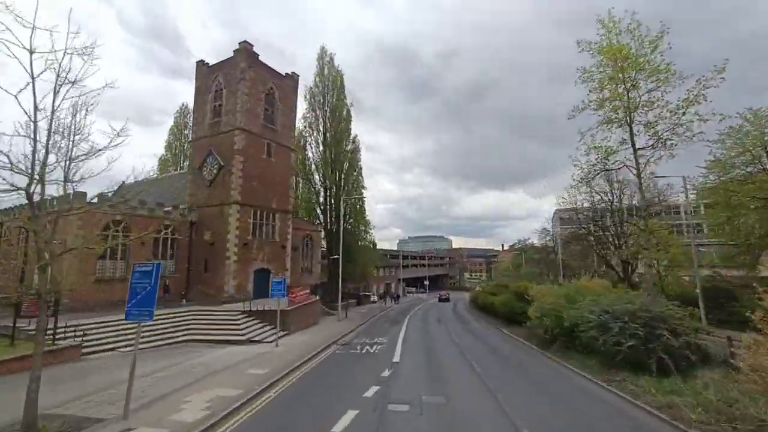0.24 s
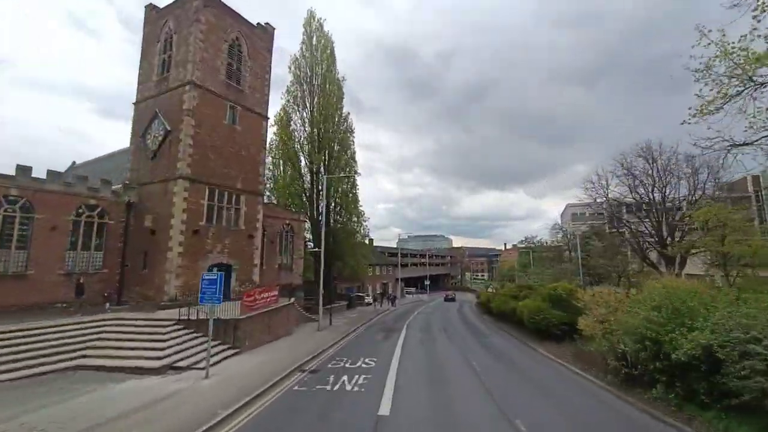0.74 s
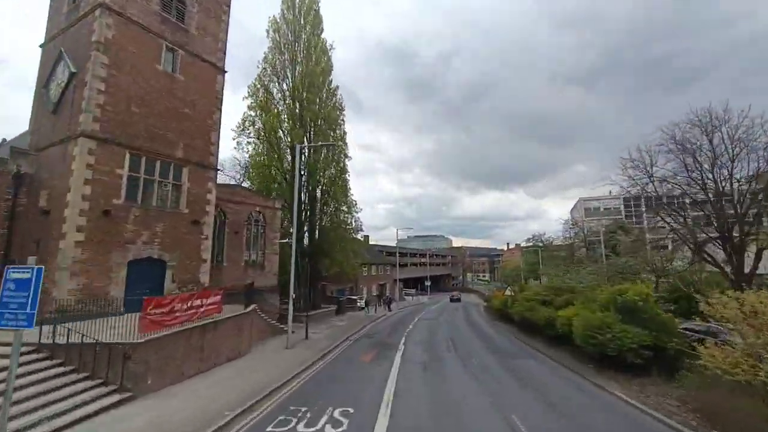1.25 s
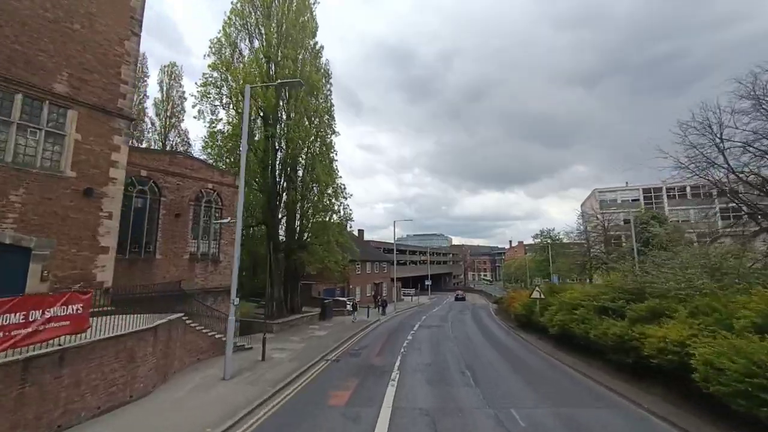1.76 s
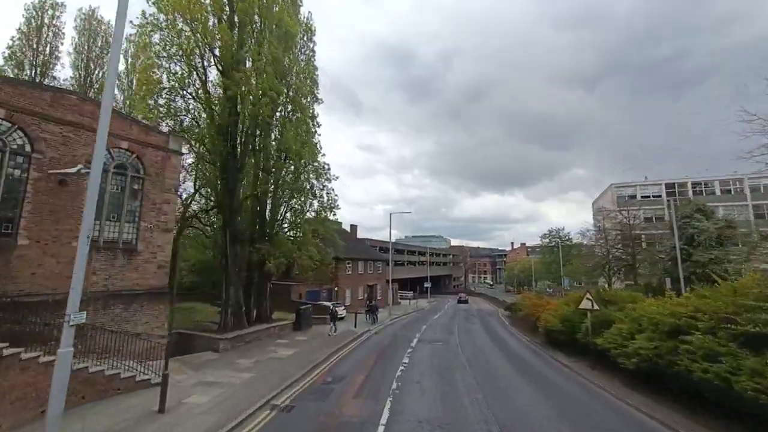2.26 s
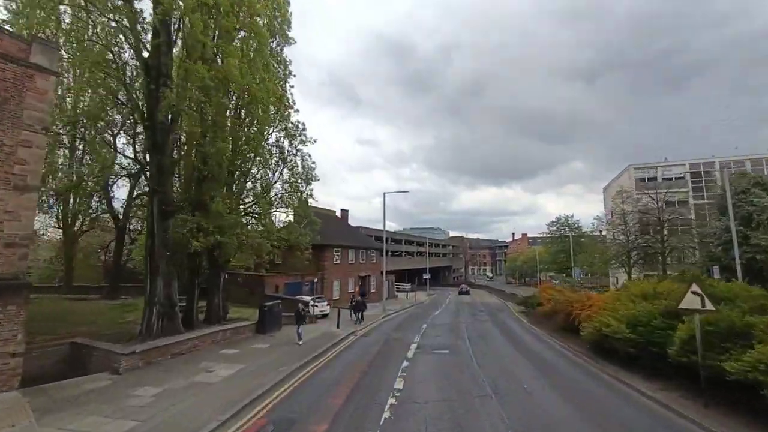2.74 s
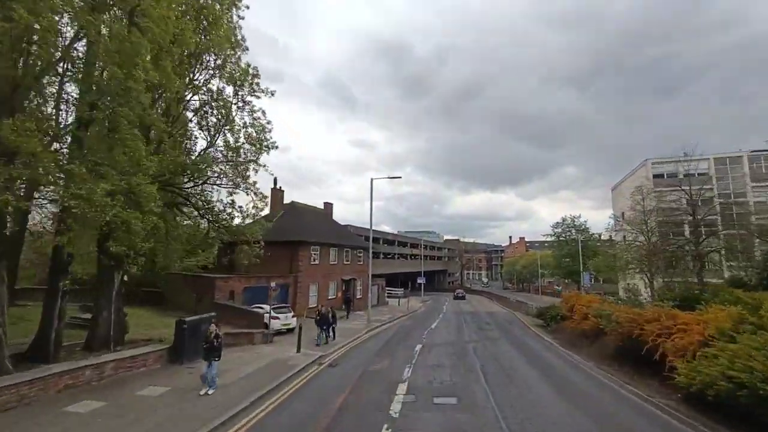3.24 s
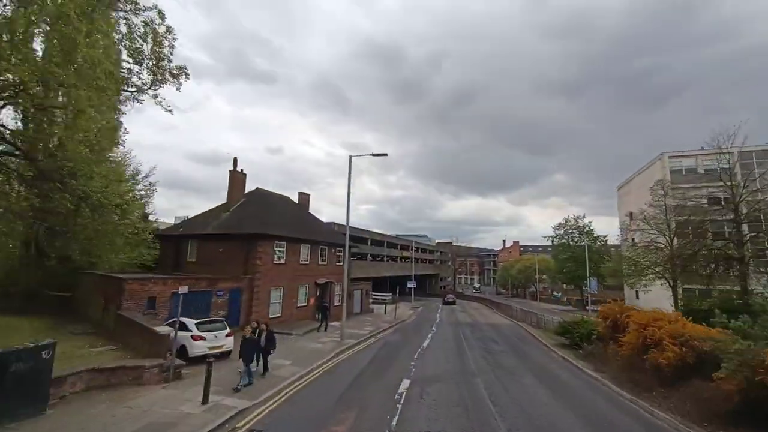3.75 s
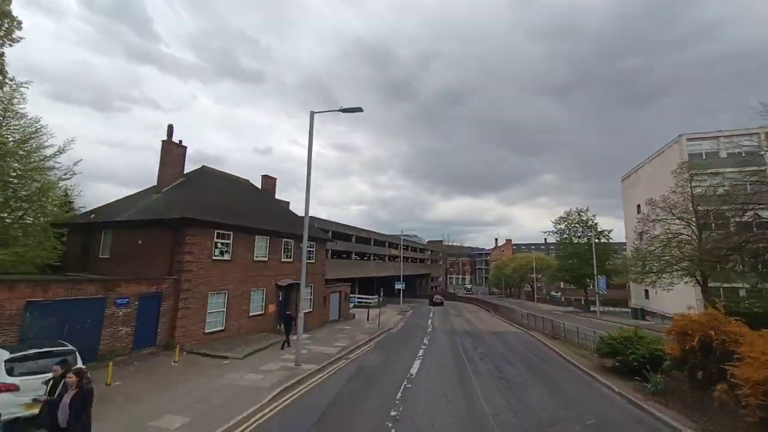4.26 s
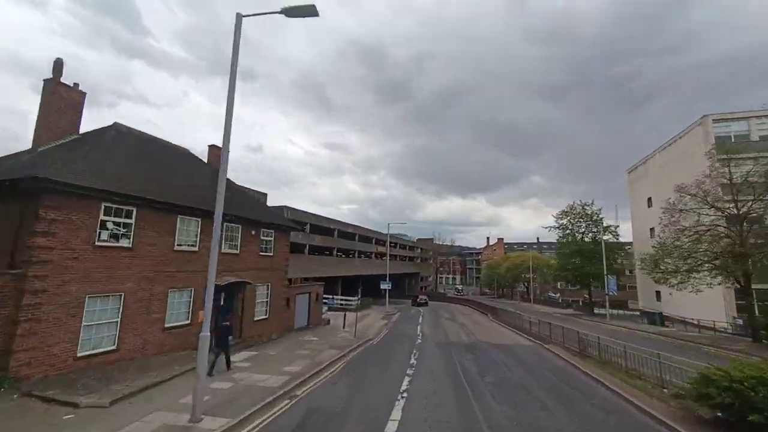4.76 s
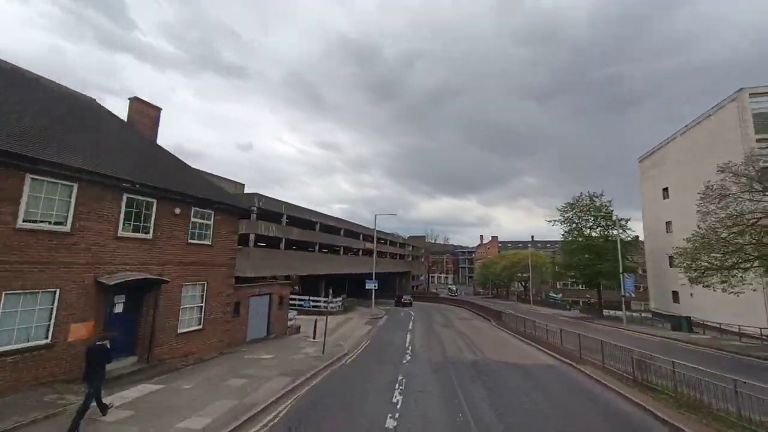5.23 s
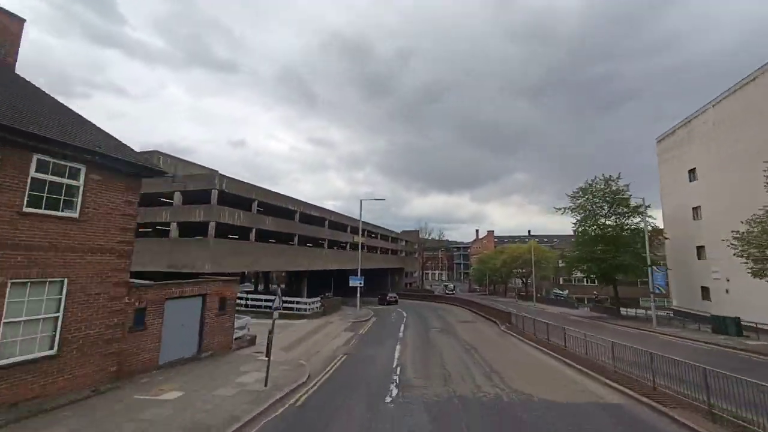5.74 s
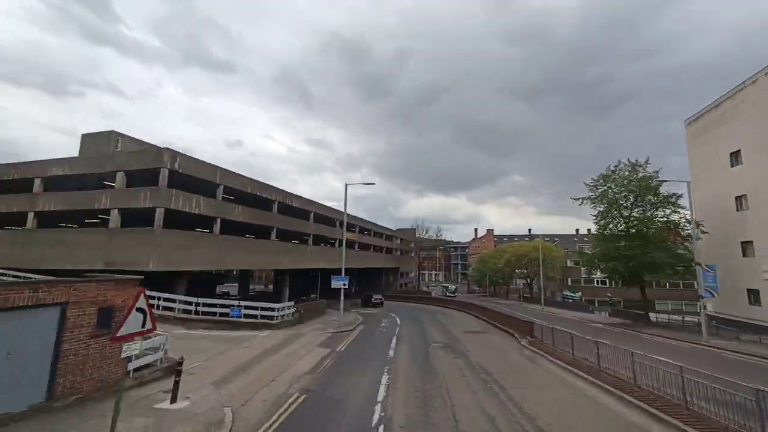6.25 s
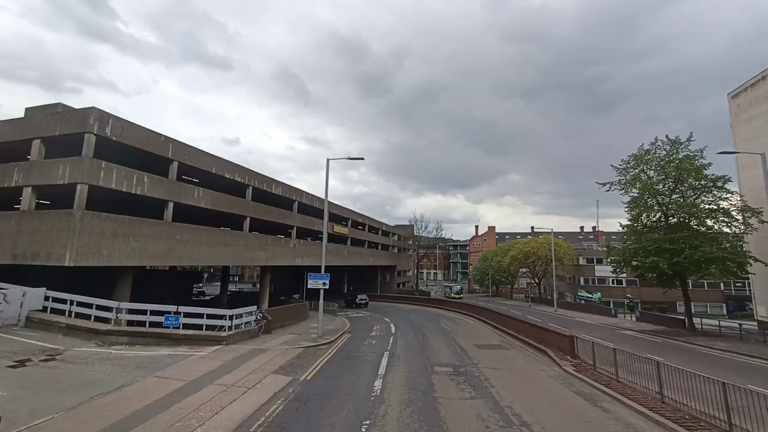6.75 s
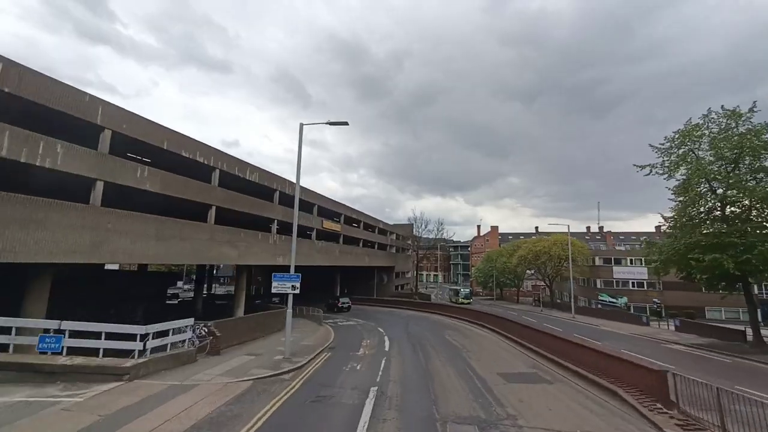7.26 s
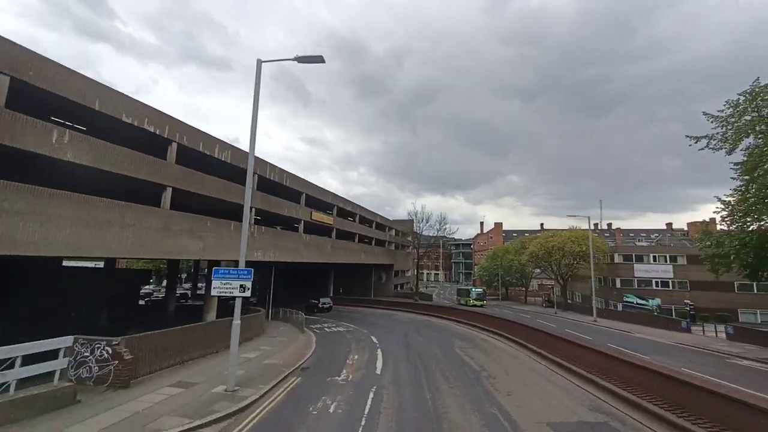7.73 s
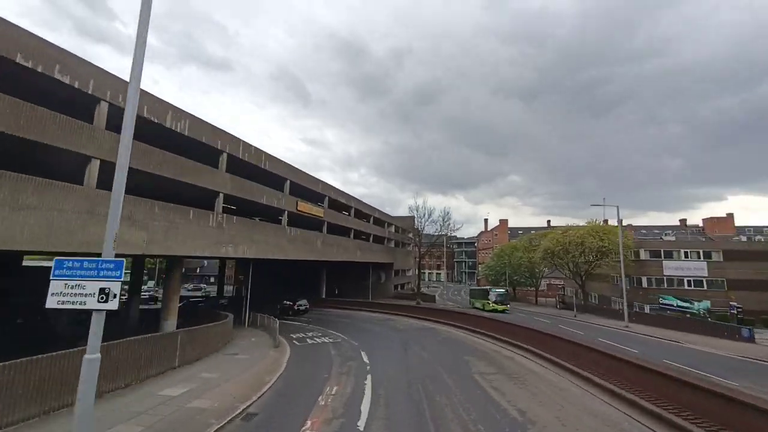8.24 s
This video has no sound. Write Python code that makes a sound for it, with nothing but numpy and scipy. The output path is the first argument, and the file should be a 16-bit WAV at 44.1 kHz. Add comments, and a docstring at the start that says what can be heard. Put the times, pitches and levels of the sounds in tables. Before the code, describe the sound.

A seat microphone upstairs on a bus catches constant low rumble, booming panels and airy trim chatter. Early gear whine fades, then jolts bring thuds, rattles, sharp ticks and tiny squeaks, clustering around five seconds. The engine swells before a downshift near seven seconds, followed by a higher hum and several falling gear whines as the bus slows.

```python
"""A diesel drones far below the upper deck of a double-decker bus, with axle whine and road rumble from the start.
The bus slows gently down a city street and shifts down once near 7 s; engine, gears and shaft are geared to its speed.
The road is filtered noise that heaves the body, booms in the panels and roars under the floor, jolted by bumps.
Trim and windows chatter as showers of tiny noise bursts, fittings tick as snap and ring, panel edges squeak as
unsteady sines, and a vent whistles faintly. The surface is coarsest near 5.6 s and 7.4 s."""
import sys
import numpy as np
from scipy import signal
from scipy.fft import rfft, irfft
from scipy.io import wavfile
from scipy.ndimage import uniform_filter1d

SR = 44100
rng = np.random.default_rng(int(sys.argv[2]) if len(sys.argv) > 2 else 0)


def bounce(signal):
    """Save signal as a 16-bit WAV file at the path given by the first command-line argument."""
    frames = np.transpose(np.atleast_2d(signal))
    limited = np.clip(frames, -1, 1)
    pcm = np.round(limited * 32767).astype(np.int16)
    wavfile.write(sys.argv[1], SR, pcm)


N = 374850
TIME = np.arange(N) / SR


def gain_of(db):
    """Turns decibels into an amplitude factor."""
    return 10 ** (np.asarray(db) / 20)


def evened(x):
    """Scales to rms 1."""
    return x / np.sqrt(np.mean(x ** 2) + 1e-20)


def follow(rows):
    """Joins the points of a curve table by straight lines: one curve per column after the time."""
    s, *columns = np.transpose(rows)
    return [np.interp(TIME, s, column) for column in columns]


def colour(x, points, tilt_db=0):
    """Filters by a spectrum drawn over octaves, tilted by some dB per octave."""
    octave = np.log2(np.fft.rfftfreq(len(x), 1 / SR) + 1)
    hz, db = np.transpose(points)
    shape_db = np.interp(octave, np.log2(hz + 1), db, left=-100, right=-100)
    tilt = tilt_db * (octave - octave.mean())
    return irfft(rfft(x) * gain_of(shape_db + tilt), len(x))


def wander(rate_hz):
    """Random drift of rms 1, smoothed to fade out above a rate."""
    s = np.arange(0, N / SR + 1, 1 / 2048)
    hz = np.fft.rfftfreq(len(s), s[1])
    smoothing = np.exp(-(hz / rate_hz) ** 2) * (hz > 0)
    slow = irfft(rfft(rng.standard_normal(len(s))) * smoothing, len(s))
    return evened(np.interp(TIME, s, slow))


def steadied(x, span_s, firmness=0.81):
    """Evens out the running rms, leaving the faster beating."""
    size = max(int(span_s * SR), 2)
    power = uniform_filter1d(uniform_filter1d(evened(x) ** 2, size), size)
    return evened(x / (abs(power) + 1e-9) ** (firmness / 2))


def add(mix, s, sound):
    """Lays a sound into the mix at a time."""
    part = mix[max(round(s * SR), 0):][:len(sound)]
    part += sound[:len(part)]


def cabin(x, t60, wet_db):
    """The direct sound and a short diffuse tail from the windows and ceiling."""
    t = TIME[:SR // 2]
    tail = rng.standard_normal(len(t)) * gain_of(-60 * t / t60)
    return x + gain_of(wet_db) * signal.fftconvolve(x, tail / np.linalg.norm(tail))[:N]


def swell(start, hold, attack_s, fall_db_per_s):
    """The gain of one event: a straight attack, a hold, then a steady fall in dB."""
    age = TIME - start
    fall_db = -fall_db_per_s * np.maximum(age - attack_s - hold, 0)
    return np.clip(age / attack_s, 0, 1) * gain_of(fall_db)


# road speed, which drives the whole driveline: time_s, axle_tooth_rate_hz
ROAD_SPEED = [(0, 660), (.6, 649), (1.4, 630), (2.4, 614), (3.7, 605), (5.6, 597), (6.3, 581), (7.0, 561),
              (7.45, 541), (7.9, 532), (8.15, 521), (8.5, 513)]


def axle_rate():
    """Axle teeth meshing per second (Hz), falling as the bus slows."""
    return follow(ROAD_SPEED)[0]


HIGH_GEAR, LOW_GEAR = 13.72, 9.65  # axle teeth passing per firing
SHIFT_S, SHIFT_LENGTH_S = 7.05, .45  # middle and length of the downshift


def firing(waver=0.004):
    """Gears the engine to the road: firing rate (Hz), firings counted with a waver, downshift progress (0-1)."""
    shifted = np.clip((TIME - SHIFT_S) / SHIFT_LENGTH_S + .5, 0, 1)
    hz = axle_rate() / (HIGH_GEAR + (LOW_GEAR - HIGH_GEAR) * shifted)
    turns = np.cumsum(hz * (1 + waver * wander(7.9))) / SR
    return hz, turns, shifted


# engine effort: time_s, level_db
ENGINE_EFFORT = [(0, -30), (1.6, -30), (2.5, -32), (4.2, -27.5), (5.7, -32), (6.55, -23), (7.05, -27.5),
                 (7.8, -26.5), (8.5, -26)]
# harmonics of the firing rate: multiple, high_gear_db, low_gear_db (relative to one another)
FIRING_HARMONICS = [(1, 4, -0.5), (2, -13.5, -9), (3, -17.5, -18.5), (4, -21, -27), (5, -22, -25.5),
                    (7, -30, -23), (11, -28, -34)]
# resonances of the deck that the engine excites: centre_hz, half_width_hz, lift_db
DECK_DRONES = [(87, 2.9, 5), (142, 6.4, 5.5)]


def engine(hz, turns, shifted, flutter_db=1.3):
    """Firing harmonics rebalance at the downshift, and the deck drones when one meets a resonance."""
    effort_db, = follow(ENGINE_EFFORT)
    out = np.zeros(N)
    for multiple, high_db, low_db in FIRING_HARMONICS:
        drone_db = sum(lift_db / (1 + ((multiple * hz - centre) / half_width) ** 2)
                       for centre, half_width, lift_db in DECK_DRONES)
        gear_db = high_db + (low_db - high_db) * shifted
        order_db = gear_db + drone_db + flutter_db * wander(6.6)
        out += gain_of(order_db) * np.cos(2 * np.pi * multiple * turns)
    return gain_of(effort_db) * evened(out)


WHINE_FLUTTER_DB, WHINE_WAVER = 1.7, .0025  # rms of the level drift, rms of the pitch drift as a fraction
WHINE_ROUGH, WHINE_FUZZ_HZ = .28, 32  # amount and width of the noise around the line


def whine(hz):
    """Meshing gear teeth: a trembling line, roughened by the play between the teeth."""
    angle = 2 * np.pi * np.cumsum(hz * (1 + WHINE_WAVER * wander(7.3))) / SR
    fuzz = wander(WHINE_FUZZ_HZ) * np.cos(angle) + wander(WHINE_FUZZ_HZ) * np.sin(angle)
    tone = np.sin(angle) + WHINE_ROUGH * fuzz
    return evened(tone * gain_of(WHINE_FLUTTER_DB * wander(10.0)))


# pairs of gears whine while they bear the load: start_s, hold_s, pitch_ratio (of the axle's rate), level_db
GEAR_WHINES = [(-.2, 1.2, 1, -58), (-.2, 1.1, .789, -51), (-.2, .85, .562, -51), (2.05, 1.2, 1, -56),
               (3.08, .4, .787, -52), (6.0, .6, 1, -53), (6.65, .25, 1, -50), (6.7, .8, .695, -52),
               (7.29, .6, 1.339, -54.5), (7.38, .65, 1, -48.5), (7.55, .9, 1.087, -51.5),
               (8.1, .35, 1, -45), (8.05, .45, .708, -49.5)]


def gears():
    """Axle and gearbox whines come and go with the load, their pitch falling with the road speed."""
    axle_hz = axle_rate()
    out = np.zeros(N)
    for s, hold, ratio, db in GEAR_WHINES:
        gain = gain_of(db) * swell(s, hold, attack_s=.07, fall_db_per_s=90)
        out += gain * whine(ratio * axle_hz)
    return out


SHAFT_TEETH = 7  # teeth on the drive pinion


def shaft(boom_gain, flutter_db=1.0, coupling_db=-10.5):
    """The drive shaft hums once per turn of its pinion, its level following the panel boom."""
    hum = np.sin(2 * np.pi * np.cumsum(axle_rate() / SHAFT_TEETH) / SR)
    return boom_gain * gain_of(coupling_db) * evened(hum * gain_of(flutter_db * wander(3.8)))


# coarseness of the road surface: time_s, coarseness_db
ROAD_SURFACE = [(0, -4), (1.2, -2), (2.7, 0), (4.2, -1.5), (5.6, 3), (6.4, -1.5), (7.4, 2.5), (8.1, -2),
                (8.5, 0.5)]


def coarseness():
    """Surface coarseness (dB), shared by the road noise and the chatter."""
    return follow(ROAD_SURFACE)[0]


# the wheels cross a bump or a broken patch: start_s, hold_s, heave_db, boom_db, roar_db
BUMPS = [(1.345, 0.064, -15, -23.5, -35.5), (1.46, 0.076, -25, -28.5, -36),
         (1.823, 0.13, -16.5, -28.5, -40.5), (2.034, 0.17, -20, -35, -45.5), (3.367, 0.23, -31, -32, -46),
         (3.737, 0.047, -37.5, -29, -64), (3.932, 0.11, -22.5, -34.5, -48.5),
         (4.399, 0.026, -29, -23.5, -41.5), (4.47, 0.032, -32.5, -29, -40.5),
         (4.717, 0.38, -28, -32.5, -47), (4.967, 0.24, -16, -33, -47), (5.106, 0.045, -18.5, -28.5, -36.5),
         (5.834, 0.12, -21.5, -44, -54.5), (6.932, 0.15, -28, -36.5, -44.5), (7.413, 0.062, -21, -45, -52),
         (8.35, .17, -21, -31, -45)]
BUMP_ATTACK_S = 0.042


def shaking(column, steady_db, surface_share, fall_db_per_s):
    """Gain of heave (0), boom (1) or roar (2): the steady surface plus the bumps, added as powers."""
    steady = gain_of(steady_db + surface_share * coarseness()) ** 2
    bumps = sum((gain_of(dbs[column]) * swell(s, hold, BUMP_ATTACK_S, fall_db_per_s)) ** 2
                for s, hold, *dbs in BUMPS)
    return np.sqrt(steady + bumps)


# Spectra, all: pitch_hz, level_db (relative within each)
# slow heave of the body, with resonances of the wheels and frame
HEAVE_SPECTRUM = [(5, -30), (9, -9.5), (13, 7), (18, -3.5), (24.5, 1.5), (29, -5.5), (34, -3), (39, -12.5),
                  (47, -16.5), (54, -9), (63, -32), (90, -52.5)]
# boom of the panels: pitch_hz, level_db
BOOM_SPECTRUM = [(50, -29), (63, -5.5), (71, 6.5), (76, -0.5), (84, 1.5), (97, -1), (104, -5), (112, -0.5),
                 (121, -4), (131, -6), (150, -10), (166, -6), (183, -10), (202, -5.5), (222, -12.5),
                 (243, -10), (280, -20), (420, -39)]
# tyres heard through the floor: pitch_hz, level_db
ROAR_SPECTRUM = [(200, -15.5), (280, -3), (330, 0.5), (380, 3.5), (480, 0.5), (570, -4.5), (660, -8),
                 (715, -6.5), (780, -14), (850, -12.5), (930, -11), (1060, -19.5), (1400, -22),
                 (2500, -40.5)]
# thud of the floor under a hard jolt: pitch_hz, level_db
THUD_SPECTRUM = [(90, -14.5), (135, 2), (310, 3.5), (620, -17), (1500, -21), (2400, -28.5)]


def road(boom_gain, thud_db=-2):
    """The road heaves the body, drums its panels and roars under the tyres; jolts thud through the floor."""
    def rumble(spectrum, span_s):
        return steadied(colour(rng.standard_normal(N), spectrum), span_s)

    heave_gain = shaking(column=0, steady_db=-25.5, surface_share=0.31, fall_db_per_s=29.0)
    roar_gain = shaking(column=2, steady_db=-42.0, surface_share=0.3, fall_db_per_s=59.5)
    heave = heave_gain * rumble(HEAVE_SPECTRUM, 0.25)
    boom = boom_gain * rumble(BOOM_SPECTRUM, .14)
    roar = roar_gain * rumble(ROAR_SPECTRUM, 0.34)
    # only what rises above the usual roar counts as a jolt
    jolt = np.maximum(roar_gain - np.median(roar_gain), 0)
    thud = jolt * gain_of(thud_db) * rumble(THUD_SPECTRUM, .04)
    return heave + boom + roar + thud


# the trim shakes loose: start_s, hold_s, level_db (before the top boost), top_boost_db
RATTLES = [(1.31, 0.88, -49, 3.5), (1.414, 0.061, -43, -15), (1.489, 0.065, -42, -1.5),
           (1.815, 0.23, -50, -9), (2.008, 0.048, -49, 11.5), (2.192, 0.022, -47.5, 7.5),
           (2.707, 0.052, -51, 8.5), (3.249, 0.086, -55.5, 5), (3.394, 0.084, -48.5, 3.5),
           (3.548, .08, -49, 4), (4.434, 0.12, -55, 4), (4.953, 0.075, -43, 4), (5.056, 0.42, -50.5, -1),
           (5.156, 0.04, -43, 7), (5.326, 0.025, -49.5, 1), (5.88, 0.016, -58, 7), (6.749, 0.049, -56, 4),
           (7.37, 0.087, -56, -4), (8.419, .1, -52, -1)]
RATTLE_ATTACK_S, RATTLE_FALL_DB_PER_S = 0.019, 86.5


def rattling(steady_db=-52, surface_share=0.67, steady_sizzle_db=0, sizzle_share=.6):
    """Level and top boost of the chatter (dB): a rush that follows the road surface, plus the rattles."""
    surface_db = coarseness()
    power = gain_of(steady_db + surface_share * surface_db) ** 2
    top = power * gain_of(steady_sizzle_db + sizzle_share * surface_db) ** 2
    for s, hold, db, sizzle_db in RATTLES:
        burst = (gain_of(db) * swell(s, hold, RATTLE_ATTACK_S, RATTLE_FALL_DB_PER_S)) ** 2
        power = power + burst
        top = top + burst * gain_of(sizzle_db) ** 2
    return 10 * np.log10(power), 10 * np.log10(top / power)


def patchy(x, depth_db):
    """Different parts rattle in turn: narrow bands swell and fade for a tenth of a second."""
    z = signal.stft(x, nperseg=512)[2]
    field = uniform_filter1d(rng.standard_normal(z.shape), size=4, axis=0)  # across neighbouring bands
    field = uniform_filter1d(field, size=18, axis=1)  # across time
    return evened(signal.istft(z * gain_of(depth_db * evened(field)), nperseg=512)[1][:N])


# ring of the trim and windows: pitch_hz, level_db (relative)
TRIM_SPECTRUM = [(500, -10), (1000, -7), (1200, -2.5), (1420, -5), (1650, 0), (1830, 3), (2100, 1),
                 (3200, -0.5), (4200, -2.5), (4650, -8), (5650, -8.5), (6400, -15.5), (7300, -25),
                 (8000, -33.5)]


def chatter(taps_per_s=450, spread_db=3.0, t60=0.13, calm_share=0.28, shaken_share=0.23,
            flicker_db=0.88, bright_db=0.5):
    """Many tiny trim contacts over an even rush of air, which takes a little more of the mix in hard shaking."""
    db, sizzle_db = rattling()
    shake = (db - db.min()) / (db.max() - db.min())
    share = np.clip(calm_share + (shaken_share - calm_share) * shake, 0, 1)  # contacts' share of the power
    tap_db = spread_db * np.minimum(rng.exponential(1, N), 3.5)
    size = gain_of(tap_db) * (rng.random(N) < taps_per_s / SR)
    # each contact is a short burst from a different part, so their powers add
    decay = gain_of(-60 * TIME[:SR // 5] / t60)
    power = signal.fftconvolve(size ** 2, decay ** 2)[:N]
    bursts = np.sqrt(abs(power)) * rng.standard_normal(N)
    contacts = evened(colour(bursts, TRIM_SPECTRUM, tilt_db=bright_db))
    air = evened(colour(rng.standard_normal(N), TRIM_SPECTRUM, tilt_db=1.0))
    rush = patchy(np.sqrt(share) * contacts + np.sqrt(1 - share) * air, depth_db=1.15)
    # the top treble is lifted or cut by itself, with its own flicker
    top = signal.sosfiltfilt(signal.butter(3, 5900, "high", fs=SR, output="sos"), rush)
    top_gain = gain_of(sizzle_db + 2.3 * wander(12)) - 1
    return gain_of(db + flicker_db * wander(22)) * (rush + top_gain * top)


FAN_HZ, FAN_WIDTH_HZ, FAN_DB = 1788, 31, -68


def fan():
    """Air whistling at a vent of the ventilation: a faint narrow band that never holds a clean pitch."""
    angle = 2 * np.pi * FAN_HZ * TIME
    whistle = wander(FAN_WIDTH_HZ) * np.cos(angle) + wander(FAN_WIDTH_HZ) * np.sin(angle)
    return gain_of(FAN_DB) * evened(whistle)


# a loose fitting knocks: start_s, peak_db (of the snap), tilt_db_per_octave, ring_db (relative to the snap)
TICKS = [(1.0215, -28, -6, -20), (7.115, -23, -3, -19), (7.1185, -40, 7, -12), (1.438, -29, 3, -12),
         (3.25, -36, 4, -9), (3.422, -37, 1, -6), (3.604, -36, -2, -6), (4.444, -38, 5, -7),
         (4.66, -33, 6, -5), (5.183, -29, -3, -4), (5.206, -31, -5, -7), (5.3355, -27, 1, -7),
         (5.36, -30, 2, -5), (5.565, -33, 0, -7), (5.914, -36, 3, -7)]
# the snap of a knock: pitch_hz, level_db (relative)
SNAP_SPECTRUM = [(350, -18), (750, -5.5), (2500, 2.5), (4500, -7.5), (6500, -14.5), (8000, -27)]


def ticks():
    """Single hard knocks of the fittings: a sharp snap, then a few milliseconds of ring in the trim."""
    t, out = TIME[:SR // 20], np.zeros(N)
    t60, lead = .025, 88  # ring decay in s; samples of room ahead of the snap's peak
    for s, db, tilt_db, ring_db in TICKS:
        snap = colour(signal.unit_impulse(len(t), lead), SNAP_SPECTRUM, tilt_db)
        ring = steadied(colour(rng.standard_normal(len(t)), TRIM_SPECTRUM, tilt_db), 0.0016)
        add(out, s - lead / SR, gain_of(db) * snap / snap.max())
        add(out, s, gain_of(db + ring_db - 60 * t / t60) * ring)
    return cabin(out, t60=0.33, wet_db=-6.5)


# a panel edge rubs: start_s, length_s, pitch_hz (at the start), level_db
SQUEAKS = [(1.66, .12, 4370, -59), (3.275, .13, 4230, -61), (3.49, .17, 4460, -62), (5.31, .2, 4290, -59.5),
           (7.06, .32, 4300, -59)]


def squeaks(stutter_db=3.5):
    """Stick and slip at a panel edge: a thin unsteady chirp that catches quickly and fades."""
    out, slip, grip = np.zeros(N), wander(210), wander(50)
    jitter, fade_db, sag = .016, -9, .02  # pitch jitter; fade and sag of pitch over one squeak
    for s, length, hz, db in SQUEAKS:
        during = (TIME >= s) & (TIME < s + length)
        progress = (TIME[during] - s) / length
        pitch = hz * (1 - sag * progress + jitter * slip[during])
        loudness = gain_of(stutter_db * grip[during] + fade_db * progress)
        chirp = np.sin(2 * np.pi * np.cumsum(pitch) / SR) * loudness
        add(out, s, gain_of(db) * evened(chirp * signal.windows.tukey(len(chirp), .3)))
    return cabin(out, t60=.2, wet_db=-18.0)


BUZZ_DEPTH = .05  # how far each firing sways the chatter


def scene():
    """Driveline, road and cabin fittings, heard from one seat; the trim buzzes a little with each firing."""
    boom_gain = shaking(column=1, steady_db=-33.5, surface_share=0.74, fall_db_per_s=73.5)
    hz, turns, shifted = firing()
    driveline = engine(hz, turns, shifted) + gears() + shaft(boom_gain)
    buzz = 1 + BUZZ_DEPTH * np.cos(2 * np.pi * turns)
    fittings = buzz * chatter() + ticks() + squeaks()
    return (driveline + road(boom_gain) + fan() + fittings)[None]


EDGE_HZ = 7930  # top of the audible band


def record(dry):
    """Limits the band with a steep linear-phase low-pass."""
    lowpass = signal.firwin(511, EDGE_HZ, window=("kaiser", 9), fs=SR)
    return signal.oaconvolve(dry, lowpass[None], "same")


dry = scene()
out = record(dry)
bounce(out)
```